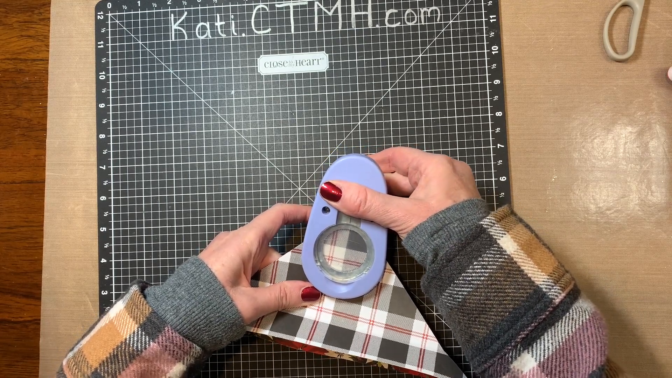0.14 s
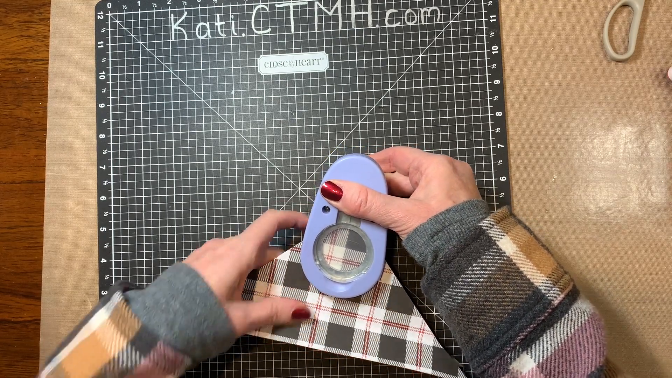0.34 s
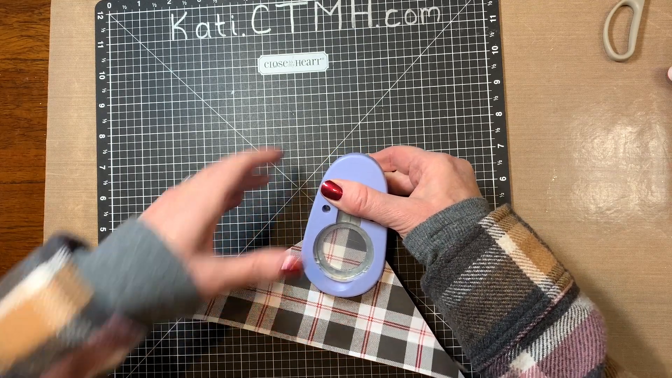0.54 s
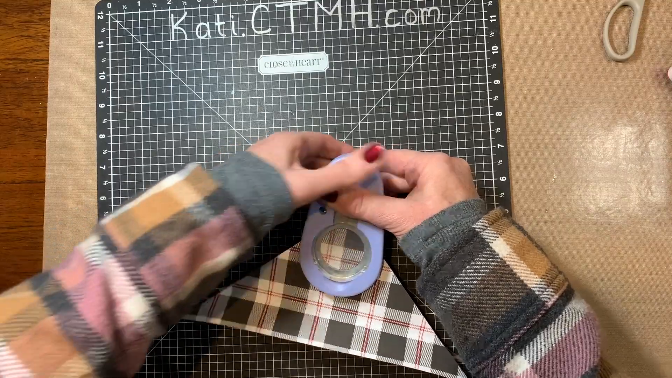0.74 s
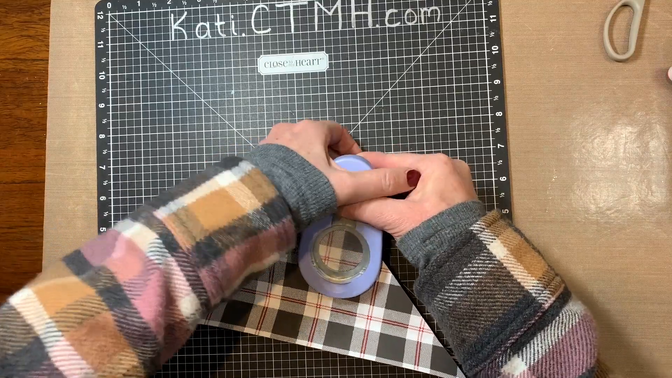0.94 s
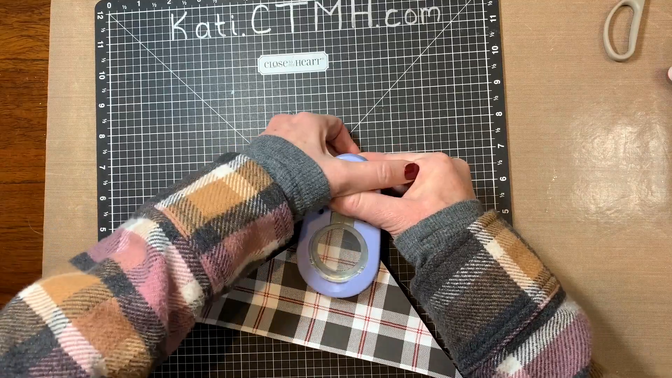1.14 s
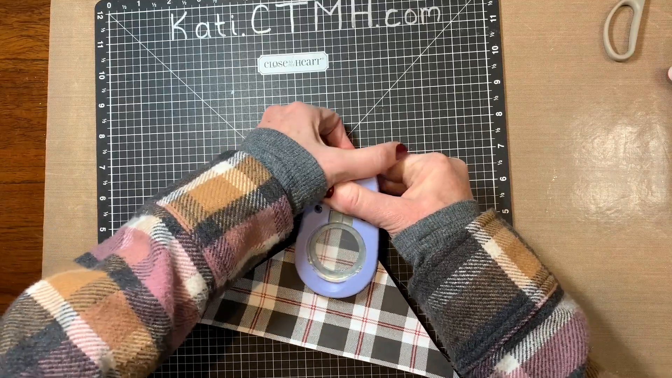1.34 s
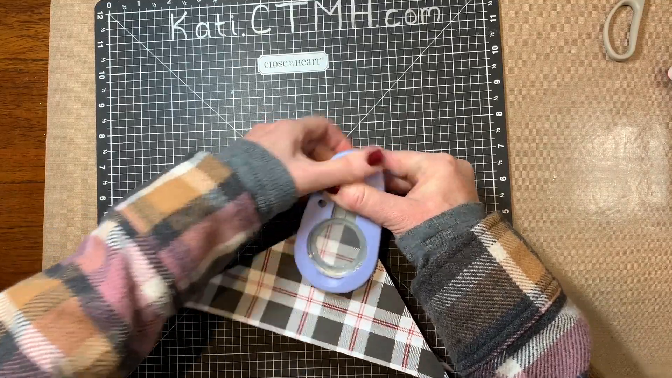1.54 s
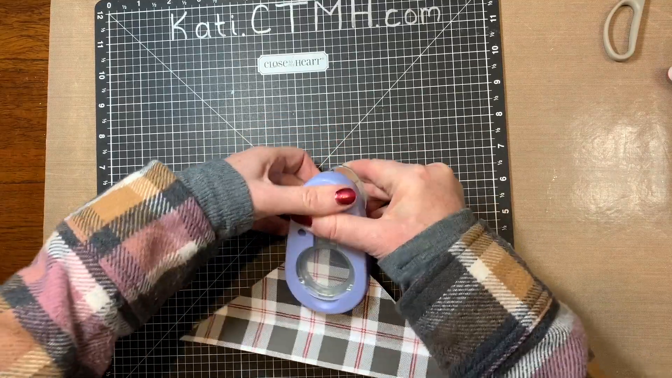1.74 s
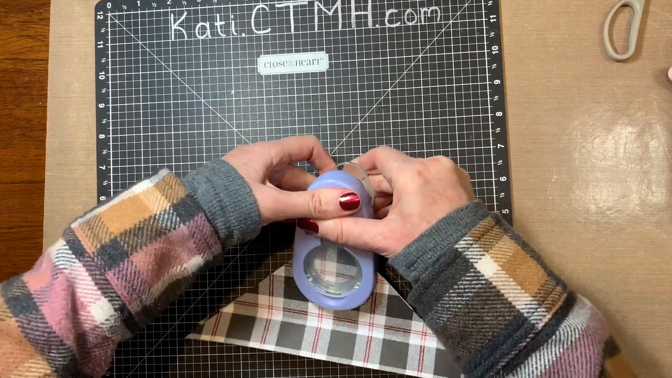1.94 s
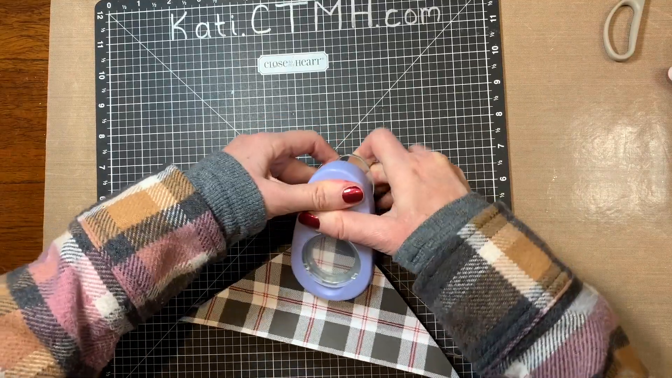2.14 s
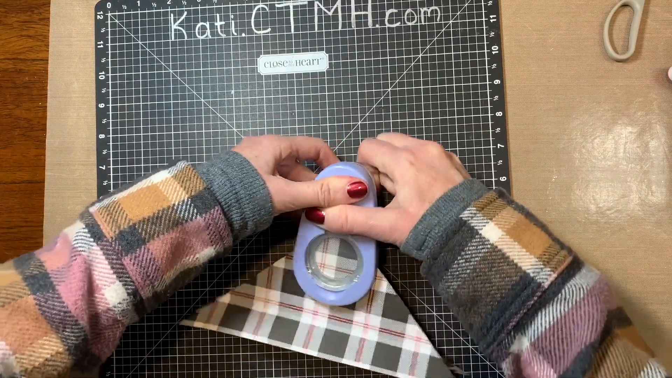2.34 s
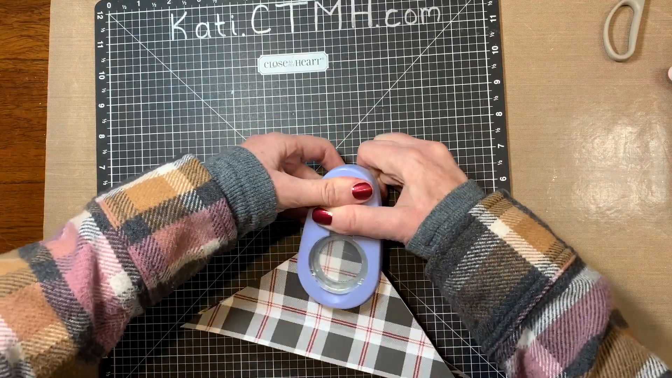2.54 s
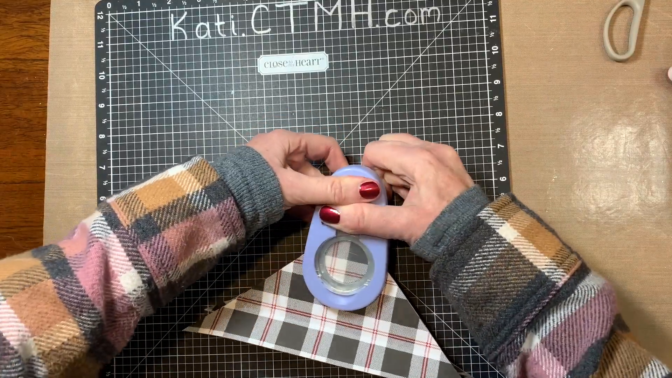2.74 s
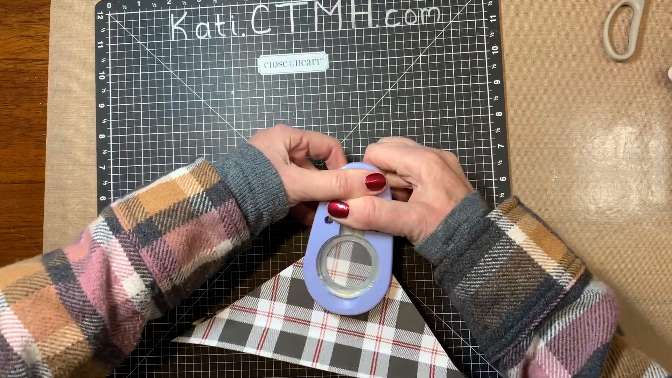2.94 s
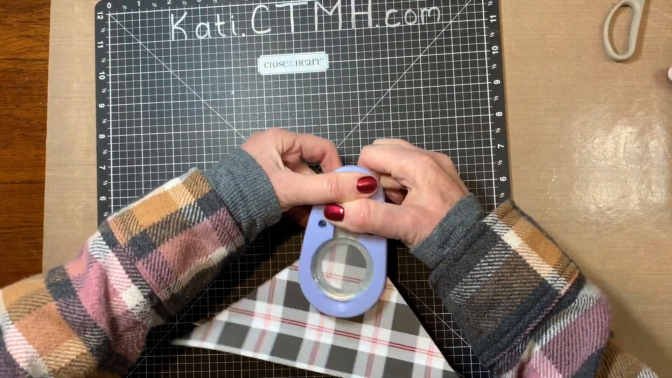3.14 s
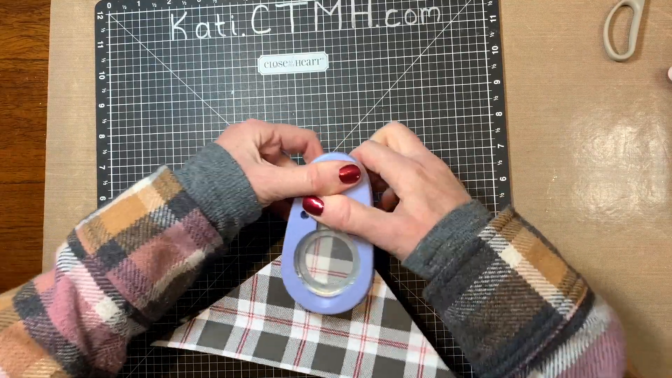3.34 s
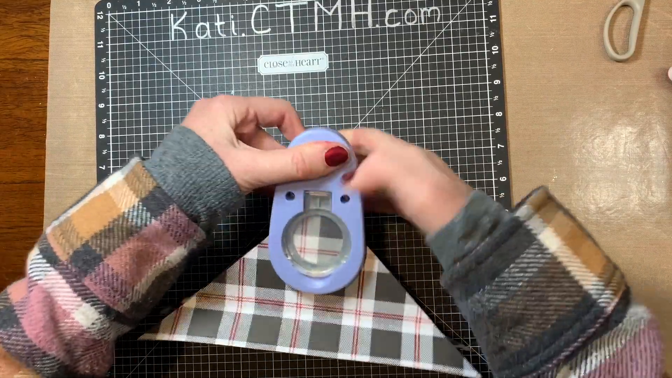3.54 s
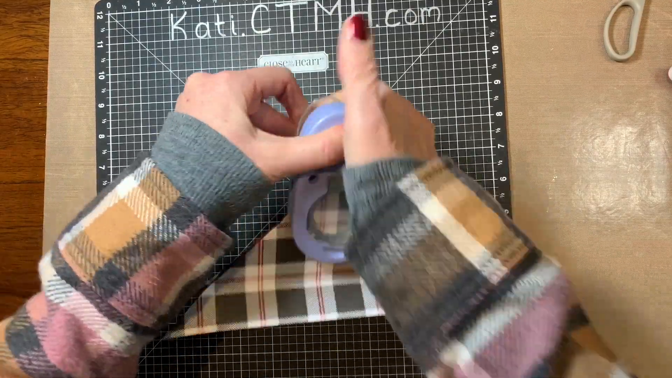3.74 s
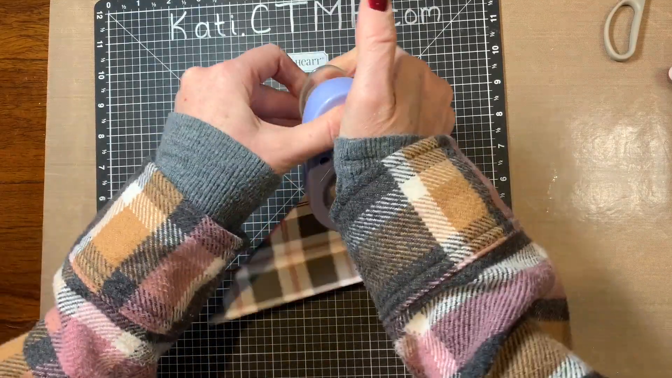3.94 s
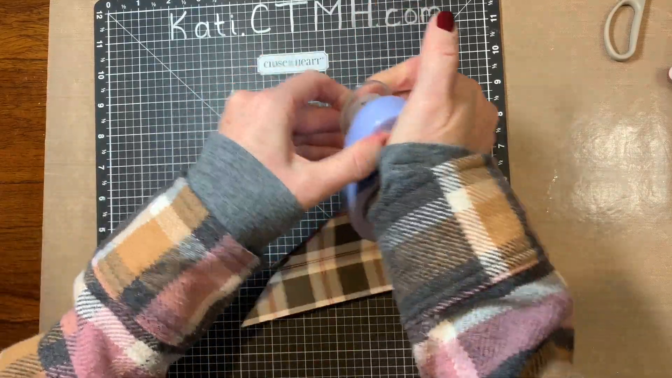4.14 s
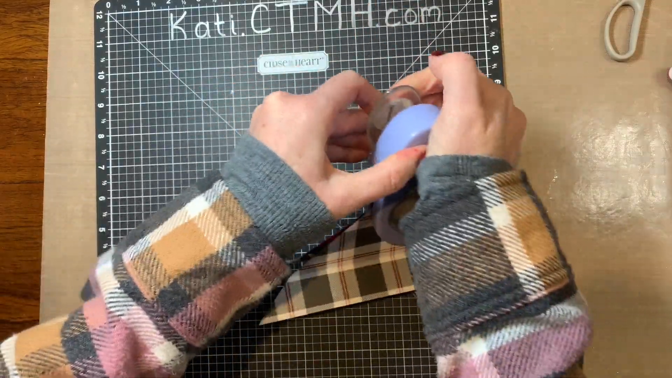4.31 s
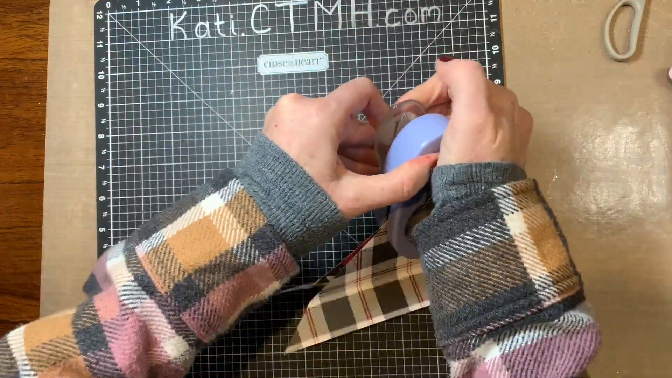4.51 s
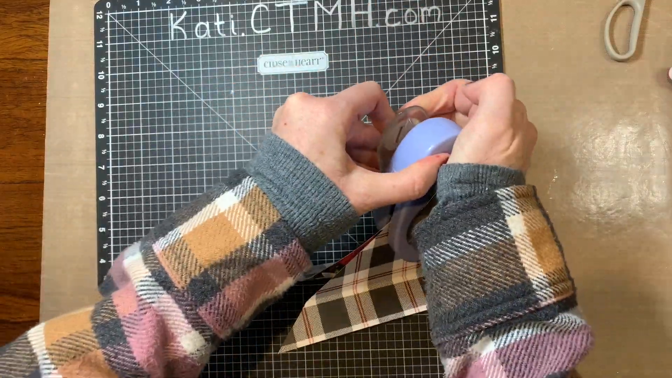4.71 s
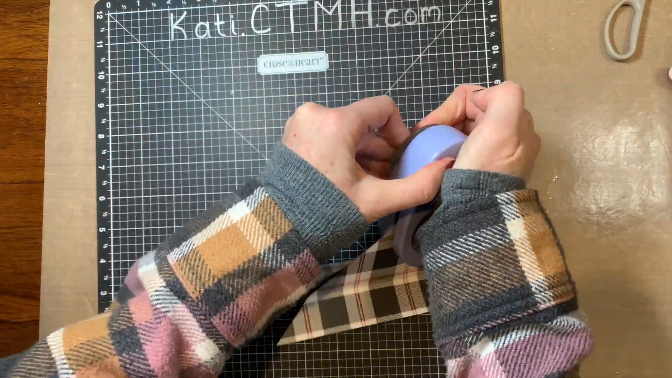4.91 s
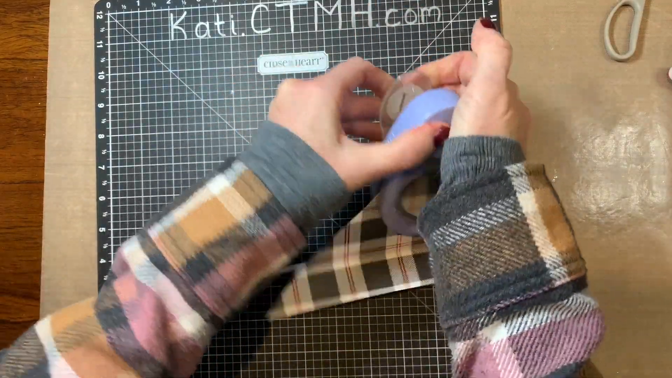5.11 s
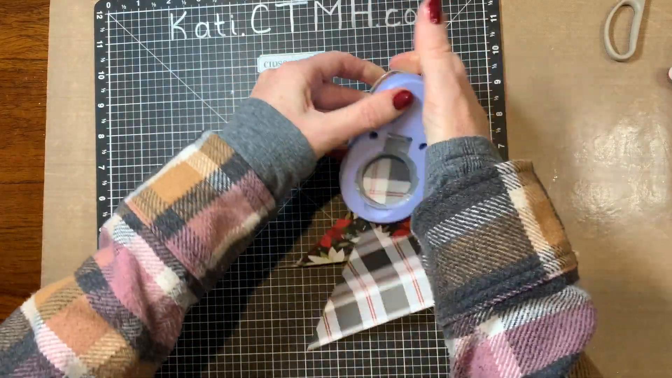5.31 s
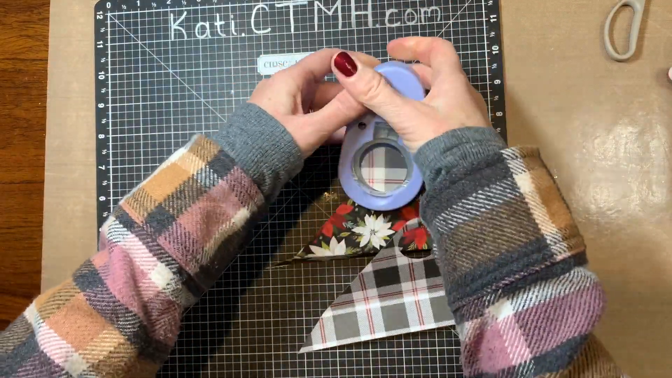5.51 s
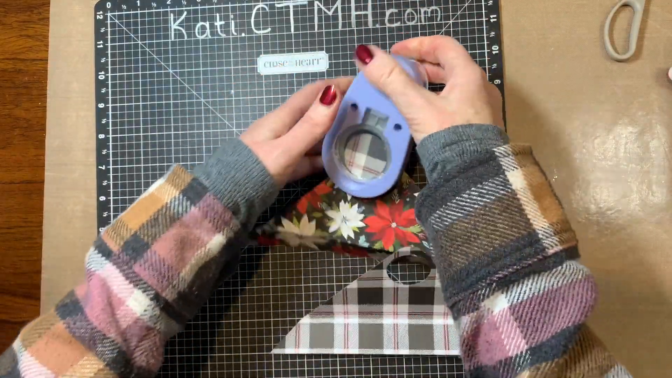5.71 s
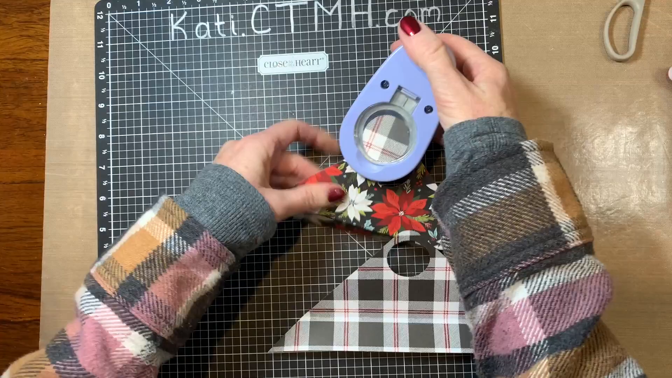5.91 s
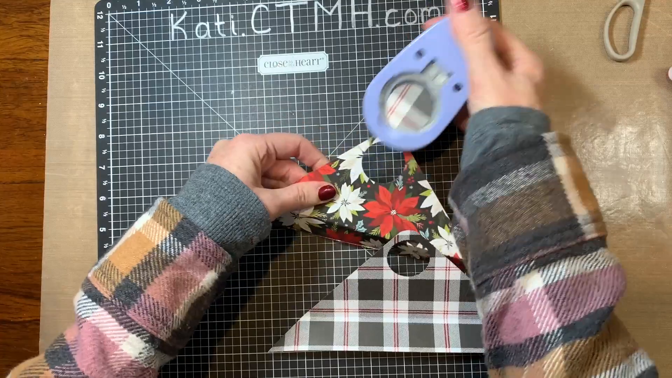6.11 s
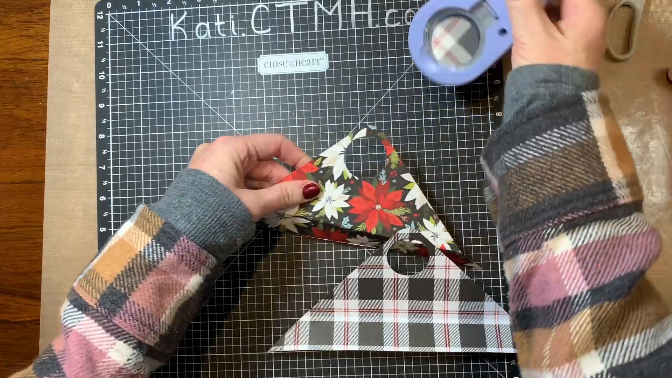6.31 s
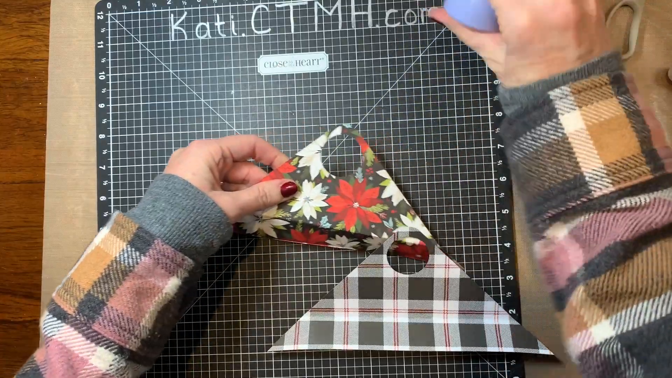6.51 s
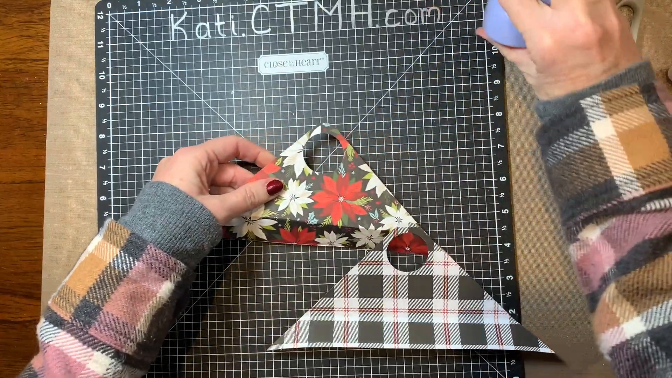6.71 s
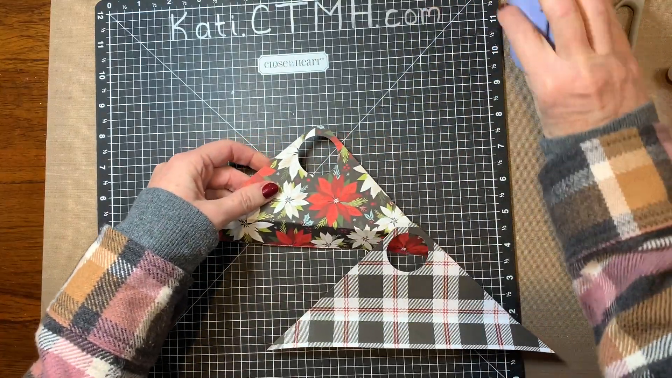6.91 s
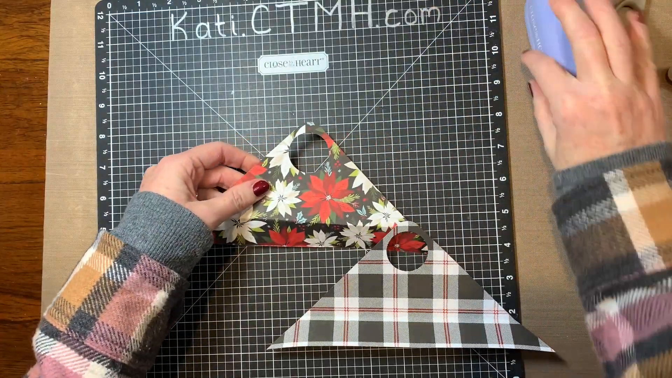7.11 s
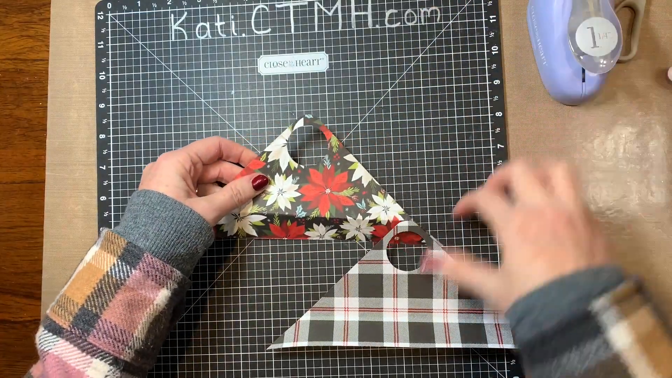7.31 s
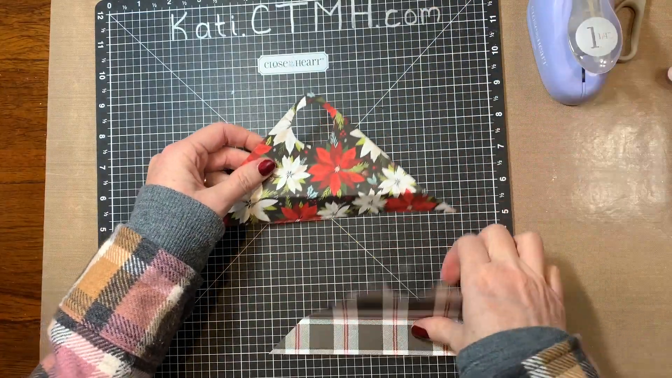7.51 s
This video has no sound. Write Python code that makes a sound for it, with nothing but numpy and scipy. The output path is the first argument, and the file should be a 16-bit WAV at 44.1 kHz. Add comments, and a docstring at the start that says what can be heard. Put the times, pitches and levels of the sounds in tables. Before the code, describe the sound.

Small plastic ticks, light table bumps and short papery rustles, then hinge creaks, a sharp snap through paper, and two knocks as the tool is set down.

```python
"""Hands squeeze a plastic circle punch through two sheets of paper on a table in a quiet room with a faint hum.
First the shell ticks, the table takes small bumps, and skin, sleeves and paper rustle in short strokes.
From about 3 s the hinge creaks three times, and at 4.7 s the blade snaps through the paper.
Then the rustling and ticking go on, the punch is set down twice near 7 s, and last strokes rustle.
Ticks, creaks and bumps are small blows on ringing modes; rustle, room echo and hum are shaped noise."""
import sys
import numpy as np
from scipy import signal
from scipy.fft import rfft, irfft, next_fast_len
from scipy.io import wavfile
from scipy.ndimage import uniform_filter1d

SR = 44100
rng = np.random.default_rng(int(sys.argv[2]) if len(sys.argv) > 2 else 0)


def materialize(psi):
    """Save the field psi as 16-bit PCM at rate SR to the path in sys.argv[1].

    A 1-D psi becomes a single channel; in a 2-D psi each row is a channel.
    """
    bounded = np.clip(np.atleast_2d(psi).T, -1, 1)
    quanta = np.round(bounded * 32767).astype(np.int16)
    wavfile.write(sys.argv[1], SR, quanta)


N = 337806  # length in samples


def gain_of(db):
    """Turns dB into a plain factor."""
    return 10 ** (np.asarray(db) / 20)


def evened(x):
    """Scales x to rms 1."""
    return x / np.sqrt(np.mean(x ** 2) + 1e-20)


def read(points, hz):
    """Reads a curve of (Hz, value) points, with straight lines over log pitch."""
    f, value = np.transpose(points)
    return np.interp(np.log(hz + 1), np.log(f + 1), value)


def add(mix, s, sound):
    """Adds a sound to the mix at s seconds, cut off at the end."""
    part = mix[round(s * SR):][:len(sound)]
    part += sound[:len(part)]


def filtered(x, curve):
    """Changes the level of each pitch in x by a curve of (Hz, dB) points."""
    size = next_fast_len(x.shape[-1])
    gain = gain_of(read(curve, np.fft.rfftfreq(size, 1 / SR)))
    return irfft(rfft(x, size) * gain, size)[..., :x.shape[-1]]


def coloured(x, spectrum):
    """Gives x the tone colour of the spectrum, at rms 1."""
    return evened(filtered(x, spectrum))


def noise(count=N):
    """White noise, equally strong at all pitches."""
    return rng.standard_normal(count)


def highpass(x, hz):
    """Takes away what lies below hz."""
    return signal.sosfilt(signal.butter(4, hz, "high", fs=SR, output="sos"), x)


def ring(modes, seconds, tilt_db=0, detune=1):
    """The answer of a set of modes to one blow: dying sine waves, with peak 1; tilt is in dB per octave."""
    hz, db, t60 = np.transpose(modes)[:, :, None]
    t = np.arange(round(seconds * SR)) / SR
    tilt = tilt_db * np.log2(hz / hz.mean())
    decay = gain_of(db + tilt - 60 * t / t60)
    out = (decay * np.sin(2 * np.pi * hz * detune * t)).sum(0)
    return out / abs(out).max()


# How far the left port runs ahead of the right. Each row: pitch in Hz, phase lead in radians.
PORT_LEAD = [(0, 0), (1500, .3), (3100, 2.0), (4400, 1.0), (5900, 4.2), (7000, 3.1), (9000, .2),
             (9560, -.1), (11000, -2.9), (12300, -3.4), (13300, -6.1), (14400, -6.4), (15400, -9.0),
             (16300, -9.6)]
# How much louder the left port is than the right. Each row: pitch in Hz, left minus right in dB.
PORT_BALANCE = [(60, 6.5), (110, -9), (200, 2.5), (380, -5), (700, 4), (1290, -1), (2380, 0), (4400, -9),
                (8120, -1.5), (15000, 2.5)]


def ports(x):
    """A near source reaches the two microphone ports with a phase lead and balance that depend on pitch."""
    size = next_fast_len(N + 4096)  # spare room for the time shifts
    hz = np.fft.rfftfreq(size, 1 / SR)
    side = np.array([[.5], [-.5]])  # half the difference for each port
    phase = np.exp(1j * side * read(PORT_LEAD, hz))
    balance = gain_of(side * read(PORT_BALANCE, hz))
    return irfft(rfft(x, size) * phase * balance, size)[:, :N]


# Sound coming from the sides. Each row: pitch in Hz, level in dB.
WALLS = [(60, -25), (300, -5), (550, -1), (900, -2), (1400, -1), (3000, -6.5), (6000, -7.5), (9000, -12.5),
         (16000, -40.5)]


def sides(x):
    """Sound that is unlike at the two ports keeps mostly its middle range."""
    return filtered(x, WALLS)


# Tone colour of the room hum and hiss. Each row: pitch in Hz, relative level in dB per Hz.
AIR = [(12, -30), (20, -10), (77, 18), (104, 3.5), (146, -5.5), (574, -19.5), (825, -32), (1220, -13.5),
       (2200, -29.5), (2460, -23), (4180, -33), (9670, -29.5), (11400, -34.5), (14300, -35), (16000, -75.5)]


def air():
    """A low wavering hum and faint hiss: noise shared by both ports, plus noise of each port's own."""
    air_db = -70.5
    shared, left, right = (coloured(noise(), AIR) for _ in range(3))
    return gain_of(air_db) * (ports(shared) + sides(np.array([left, right])))


# How fast the room echo dies. Each row: pitch in Hz, time to fall by 60 dB in seconds.
ROOM = [(150, 0.076), (500, 0.3), (1500, 0.2), (4000, 0.3), (9000, 0.24), (15000, 0.3)]


def room(x):
    """Echo: sparse taps of random sign, each band dying at its own speed, other taps for each ear."""
    taps = np.zeros((2, SR // 2))
    slots = np.arange(200, SR // 2 - 20, 20)  # one tap in every 20 samples
    at = slots + rng.integers(0, 20, (2, len(slots)))
    np.put_along_axis(taps, at, rng.choice([-1., 1.], at.shape), 1)
    hz, t, z = signal.stft(taps, SR, nperseg=256)
    decay = gain_of(-60 * t / read(ROOM, hz)[:, None])
    tail = signal.istft(z * decay, SR, nperseg=256)[1]
    return signal.fftconvolve(x[None], tail / np.linalg.norm(tail[0]), axes=1)[:, :N]


def grains(per_s, spread_db, smooth):
    """Sparse slips of very unequal size over a smooth bed of friction noise."""
    size = gain_of(spread_db * np.minimum(rng.exponential(1, N), 5))
    happens = rng.random(N) < per_s / SR
    return evened(size * happens * rng.choice([-1., 1.], N)) + smooth * noise()


def resonate(x, hz, width):
    """A resonance with moving pitch: shifts the curve hz down to zero, smooths, and shifts back."""
    turn = np.exp(2j * np.pi * np.cumsum(hz) / SR)
    r = np.exp(-np.pi * width / SR)
    return 2 * (turn * signal.lfilter([1 - r], [1, -r], x / turn)).real


def crinkled(x):
    """Random patches, some tens of ms by some hundreds of Hz, swell and fade; the result has rms 1."""
    depth_db = 2.5
    z = signal.stft(x, nperseg=512)[2]
    patches = uniform_filter1d(noise(z.shape), size=9, axis=0)  # smooth over pitch
    patches = evened(uniform_filter1d(patches, size=7, axis=1))  # smooth over time
    return evened(signal.istft(z * gain_of(depth_db * patches), nperseg=512)[1][:len(x)])


# Strokes of skin, sleeve and paper. Each row: start in seconds, length in seconds,
# then the levels in dB of the rub on the shell, the paper hiss and the drag on the table.
STROKES = [(0.034, 0.056, -70, -78, -77), (0.251, 0.04, -68, -67.5, -79), (0.331, 0.038, -68.5, -71, -76),
           (0.408, 0.07, -89.5, -100, -85), (0.675, 0.02, -55, -66, -63), (0.72, 0.014, -101, -104, -69),
           (0.89, 0.27, -83, -93, -82.5), (0.94, 0.012, -88, -78, -99), (1.03, 0.0092, -88, -82, -94),
           (1.216, .03, -74.5, -79, -76), (1.307, 0.097, -80, -100, -78.5), (1.463, .13, -70, -78.5, -76),
           (1.621, 0.023, -66, -61, -67), (1.724, 0.019, -61, -66, -75.5), (1.89, 0.25, -77.5, -82, -82.5),
           (1.993, 0.028, -81, -67, -83), (2.141, 0.038, -73.5, -114, -65), (2.236, .13, -71, -80, -76),
           (2.321, 0.029, -83, -66, -85), (2.475, 0.29, -82, -85, -91.5), (2.824, 0.13, -71.5, -103, -89),
           (3.28, 0.21, -78.5, -85.5, -84.5), (3.657, 0.11, -83, -81.5, -87),
           (3.843, 0.34, -84, -86, -79.5), (4.23, 0.25, -77, -84, -84.5), (4.72, 0.23, -67, -65, -99),
           (4.997, 0.087, -61, -58.5, -76.5), (5.098, .27, -67.5, -61, -77),
           (5.421, 0.083, -73, -76, -77.5), (5.59, 0.14, -68.5, -62.5, -82),
           (5.786, 0.17, -66, -67.5, -71.5), (6.007, 0.12, -64, -63, -88), (6.18, 0.087, -80, -79.5, -94),
           (6.327, .015, -92, -71.5, -90.5), (6.38, 0.25, -79, -71.5, -96), (6.871, 0.49, -79, -75, -96),
           (7.158, 0.11, -65, -66.5, -64.5), (7.356, 0.12, -57.5, -56.5, -66.5),
           (7.551, 0.026, -61, -56.5, -75)]


def strokes(t):
    """Gains of rub, hiss and drag: every stroke swells in, holds and dies away alike."""
    rise_db_per_s, fall_db_per_s = 698.5, 282.5
    start, length, *levels = np.transpose(STROKES)[:, :, None]
    coarse = t[::64]
    before = np.maximum(start - coarse, 0)
    after = np.maximum(coarse - start - length, 0)
    shape_db = -rise_db_per_s * before - fall_db_per_s * after
    return [np.interp(t, coarse, gain_of(db + shape_db).sum(0)) for db in levels]


# Squeak of the rub in the cupped hand. Each row: time in seconds, pitch in Hz.
CUPPING = [(0.0, 1178), (0.32, 1484), (2.73, 1740), (3.05, 2113), (3.28, 1360), (3.73, 1966), (3.86, 1233),
           (3.95, 2000), (4.65, 1300), (4.69, 1896), (5.8, 1673), (6.01, 1270), (6.19, 1880), (7.0, 1893),
           (7.04, 1214), (7.66, 2090)]
# Tone colours of the rub on the shell, the paper hiss and the drag on the table.
# Each row: pitch in Hz, relative level in dB per Hz.
RUB = [(600, -28), (950, -0.5), (1400, -3.5), (2200, 1.5), (3500, -7.5), (5000, -34.5), (7000, -35)]
HISS = [(1500, -20.5), (2500, -7.5), (4000, -5.5), (7000, -4.5), (9000, -4), (11500, -9), (14000, -16.5),
        (16000, -9)]
DRAG = [(100, -21), (180, 6.5), (300, 7.5), (500, 4), (750, -1), (1100, -34.5)]


def sliding():
    """Skin rubs the shell with a squeak that follows the cupped hand; paper hisses and drags on the table."""
    t = np.arange(N) / SR
    rub, hiss, drag = strokes(t)
    flicker = gain_of(2.1 * evened(uniform_filter1d(noise(), 700)))  # surfaces catch and let go
    slips = grains(per_s=900.0, spread_db=5.0, smooth=0.98)
    hz = np.interp(t, *np.transpose(CUPPING))
    squeak = evened(resonate(resonate(slips, hz, 430.0), hz, 470.0))
    skin = rub * flicker * crinkled(0.55 * squeak + coloured(slips, RUB))
    paper = hiss * flicker * crinkled(coloured(grains(1400.0, 3.5, 6.9), HISS))
    dragging = drag * coloured(grains(270.0, 1.0, 0.13), DRAG)
    return skin + paper + dragging


# Bumps on the table top. Each row: start in seconds, peak in dB before the high-pass,
# hardness from 0 to 1 (harder favours the upper modes), time scale of the dying jolts in ms.
BUMPS = [(0.645, -43, 0.45, 37), (1.539, -59, 0.5, 13), (1.625, -41, 0.13, 4.3), (1.73, -58, 0.9, 20),
         (2.177, -51.5, 0.9, 6.4), (2.229, -32, 0.04, 7.3), (2.431, -54, 0.26, 13), (4.727, -32, 1, 2.4),
         (5.181, -46.5, 1, 2.7), (5.911, -59, 0.35, 6.6), (6.022, -48.5, 1, 6.4), (6.711, -25.5, 0, 22),
         (7.091, -19, 0.75, 17.4), (7.144, -23.5, 0.55, 2.9), (7.378, -56, 0.87, 42),
         (7.562, -52, 0.47, 8.2)]
# Ringing of the table top. Each row: pitch in Hz, relative level in dB, time to fall by 60 dB in seconds.
TABLE = [(58.5, -23.5, 0.51), (96.1, -15.5, 0.44), (144.3, -7, 0.33), (198.4, 0.5, 0.097),
         (256.3, -4, 0.18), (317, 6, 0.052), (422, -7, 0.028), (476, 0, 0.055), (598, -8.5, 0.045),
         (680, -8, 0.088)]


def bumps():
    """A soft push and smaller jolts set the table top ringing; no lasting pressure reaches the microphone."""
    out, t = np.zeros(N), np.arange(4000) / SR
    for s, peak_db, hard, ms in BUMPS:
        jolts = noise(len(t)) * np.exp(-t / (ms / 1000))
        jolts[0] = 0.75 * np.linalg.norm(jolts)  # the first push
        soft = np.convolve(jolts, np.hanning(40))  # each blow lasts about 1 ms
        detune = 1 + .02 * noise((len(TABLE), 1))
        modes = ring(TABLE, 0.62, tilt_db=20. * (hard - .5), detune=detune)
        knock = signal.fftconvolve(modes, soft)
        add(out, s, gain_of(peak_db) * knock / abs(knock).max())
    return highpass(out, 70.)


# Ringing of the plastic shell, hollow body and lever, before the hand shortens it.
# Each row: pitch in Hz, relative level in dB, time to fall by 60 dB in seconds.
HOLLOW = [(1170, -8, .035), (1280, 0, .04), (1380, -6, .035), (1520, -11, .03)]
LEVER = [(1502, -3.5, 0.037), (2000, -3.5, 0.023), (2382, -3, 0.021), (2192, 15.5, 0.015), (2666, 2, 0.11),
         (3284, 3.5, 0.066), (2980, -6, 0.36)]
# Stick-slip creaks of the hinge under pressure.
# Each row: start in seconds, end in seconds, typical slip level in dB before ringing, rough slips a second.
CREAKS = [(2.888, 2.99, -63, 69), (3.393, 3.54, -60, 59), (4.249, 4.44, -55, 72)]


def creaks():
    """The hinge slips at an uneven pace; the gripping hand damps each ring of the shell."""
    slips = np.zeros(N)
    for start, end, db, per_s in CREAKS:
        uneven, size = noise((30, 2)).T
        s = start + np.cumsum(np.exp(.2 * uneven)) / per_s
        inside = s < end
        slips[(s[inside] * SR).astype(int)] = gain_of(db + 2 * size[inside])
    shell = ring(HOLLOW, .05) + ring(LEVER, .05)
    damped = shell * np.exp(-np.arange(len(shell)) / SR / .009)
    return highpass(signal.oaconvolve(slips, damped)[:N], 900.)


def started(x):
    """Sets the first 6 ms of x to rms 1."""
    return x / np.sqrt(np.mean(x[:round(.006 * SR)] ** 2))


# Ticks, snaps and knocks of the punch. Each row: start in seconds, then the levels in dB of the
# hollow ring, the lever ring and the crack (each over its first 6 ms, before the high-pass),
# pitch of the hollow ring in the grip in Hz, time scale of the crunch in ms.
TICKS = [(0.0353, -44, -63, -46, 1236, 1.57), (0.351, -53.5, -83, -62.5, 1577, 6.5),
         (0.643, -48.5, -58, -61.5, 1550, 7.5), (0.9463, -65, -63.5, -74, 1000, 1.9),
         (1.254, -57.5, -64, -65, 1370, 3.3), (1.4554, -59, -57.5, -66.5, 1490, 1.4),
         (1.481, -63, -56.5, -81, 1270, 1.4), (1.5467, -57.5, -65, -70, 1460, 2.5),
         (1.6116, -56.5, -70, -44.5, 1720, 3), (1.6284, -55, -46.5, -70, 1230, 2),
         (1.7258, -58.5, -81, -54.5, 1680, 3.9), (2.1804, -56.5, -92, -88, 1510, 4.8),
         (2.226, -49.5, -65, -53.5, 1580, 2.7), (2.276, -61, -54, -58, 1040, 1.5),
         (2.4525, -55.5, -56, -84, 1020, 2.3), (2.4764, -53, -59.5, -63, 1040, 2.3),
         (2.5456, -55.5, -61, -90, 1020, 1.2), (2.5759, -54.5, -52, -54, 1340, 2.2),
         (2.8093, -52, -44.5, -47.5, 1610, 1.9), (2.8843, -69, -56, -84, 1250, 2.5),
         (3.041, -72, -53.5, -66, 1410, 2.1), (3.0704, -77, -66, -58.5, 1430, 1.5),
         (3.2405, -61, -71, -82, 1330, 3.3), (3.3152, -57.5, -71, -75, 1260, 2.2),
         (3.3369, -44.5, -54, -61.5, 1350, 2.2), (3.3915, -75, -59, -79, 1330, 1.9),
         (3.4237, -61.5, -56, -65.5, 1390, 6), (3.4479, -77, -55.5, -67, 1340, 2.5),
         (3.4864, -65, -61, -88, 1460, 2.5), (3.5188, -65, -58, -71, 1440, 2.6),
         (3.6565, -60, -50, -51, 1540, 3), (3.6852, -65, -53.5, -71, 1420, 2.5),
         (3.844, -62.5, -68, -71, 1280, 4.2), (3.904, -54, -55.5, -83, 1290, 3.3),
         (3.9303, -66, -54.5, -55.5, 1310, 1.4), (3.9656, -57, -41, -49, 1330, 1.6),
         (4.0457, -60, -51.5, -74, 1380, 1.5), (4.0808, -64, -53.5, -68, 1150, 4.7),
         (4.102, -51.5, -40, -42.5, 1200, 2.15), (4.1632, -57.5, -54, -58, 1290, 3.7),
         (4.246, -65, -58, -81, 1320, 2.5), (4.4996, -64.5, -68.5, -68, 1120, 0.86),
         (4.551, -45, -56, -75.5, 1240, 1.7), (4.6377, -49, -54, -60.5, 1320, 0.94),
         (4.7232, -33.5, -28, -27.5, 960, 3.2), (4.7272, -43.5, -29.5, -24.5, 1110, 2),
         (4.732, -31, -41.5, -21.5, 1370, 2), (4.9593, -59, -51, -60, 1150, 2.8),
         (4.9842, -62, -47.5, -59, 1100, 1), (5.0681, -51, -45.5, -42.5, 1410, 2.4),
         (5.1243, -56, -73, -63, 1240, 1.7), (5.1763, -49.5, -54, -55, 1670, 4.6),
         (5.4209, -59, -44.5, -47.5, 1660, 0.98), (5.6617, -54.5, -56, -50, 1570, 1),
         (5.9055, -55.5, -75, -53.5, 1050, 3.5), (6.0171, -40, -50, -48, 1250, 3.3),
         (6.1484, -64, -67.5, -60.5, 970, 1.3), (6.2353, -78, -61.5, -71, 1330, 3.1),
         (6.402, -69, -65, -57, 1240, 3), (6.708, -40.5, -28.5, -26, 1170, 1.6),
         (7.0868, -29, -36, -34, 1493, 3), (7.0926, -24, -25.5, -23, 1257, 2.2),
         (7.1362, -40, -55, -40, 1360, 1.8)]
# Tone colour of the crack. Each row: pitch in Hz, relative level in dB per Hz.
CRACK = [(500, -69.5), (1000, -23), (2000, -6.5), (3500, -13), (6000, -1.5), (8600, -3.5), (11500, -10),
         (14000, -13), (16000, -19.5)]


def ticks():
    """Each tick is a first slip and a short crunch of micro-slips that crack and ring the shell."""
    first_slip = 0.59  # against the whole crunch
    cup_hz, grip_t60_s = 1280, .045  # pitch of the unshifted hollow ring; the hand shortens every ring
    out, t = np.zeros(N), np.arange(2500) / SR
    grip_decay = gain_of(-60 * t[:SR // 20] / grip_t60_s)
    for s, hollow_db, lever_db, crack_db, hz, ms in TICKS:
        u = t / (ms / 1000)
        crunch = (1 - np.exp(-u / 0.96)) * np.exp(-u)  # builds up, then dies
        slips = noise(len(t)) ** 3 * crunch  # cubing makes a few slips stand out
        slips[0] = first_slip * np.linalg.norm(slips)
        for db, modes, grip in (hollow_db, HOLLOW, hz / cup_hz), (lever_db, LEVER, 1):
            detune = grip * (1 + .03 * noise((len(modes), 1)))
            held = ring(modes, .05, detune=detune) * grip_decay
            add(out, s, gain_of(db) * started(signal.fftconvolve(slips, held)))
        crack = coloured(noise(len(t)), CRACK) * crunch
        add(out, s, gain_of(crack_db) * started(crack))
    return highpass(out, 985.0)  # the small shell radiates no bass


def scene():
    """Adds the punch, the table, their echoes and the air of the room, in stereo."""
    near, table = ticks() + creaks() + sliding(), bumps()
    front_echo = gain_of(-13) * room(near)[0]  # passes through the ports like a near source
    side_echo = sides(room(near + table))
    return ports(near + table + front_echo) + side_echo + air()


def record(dry):
    """The band limit of the recorder: a steep low-pass at 16400 Hz."""
    lowpass = signal.firwin(511, 16400, window=("kaiser", 9), fs=SR)
    return signal.oaconvolve(dry, lowpass[None], "same")


dry = scene()
out = record(dry)
materialize(out)
```